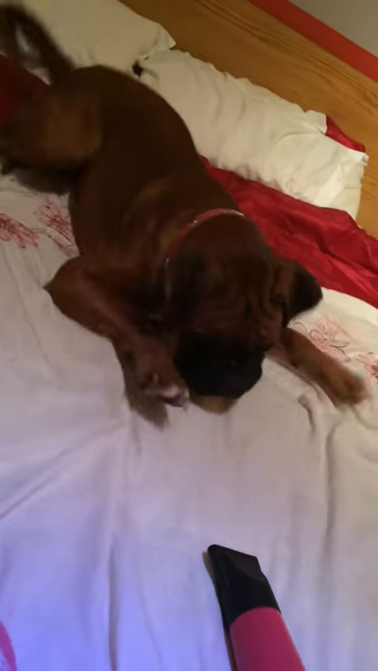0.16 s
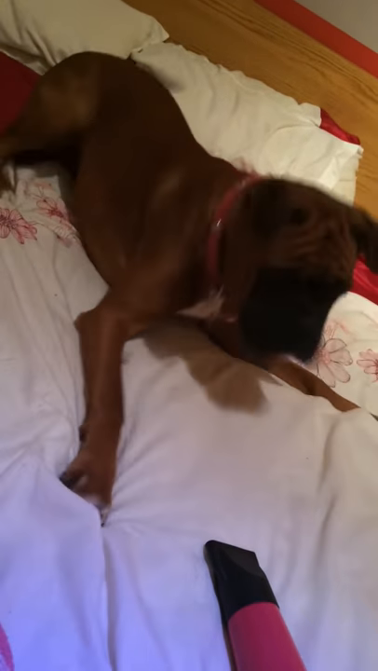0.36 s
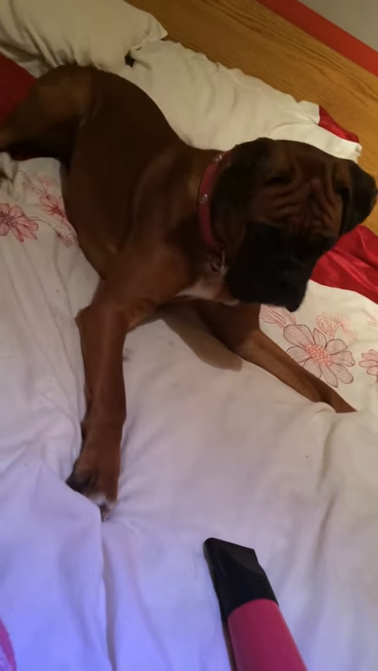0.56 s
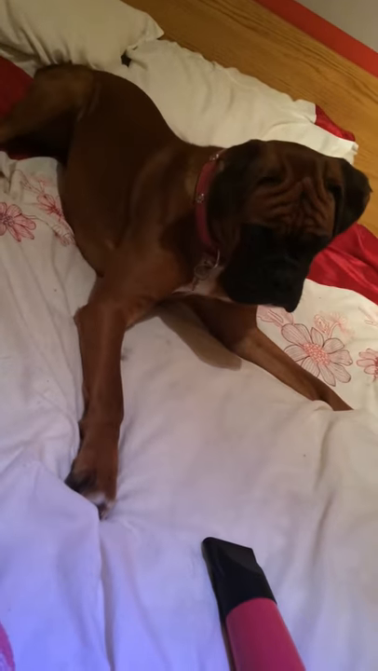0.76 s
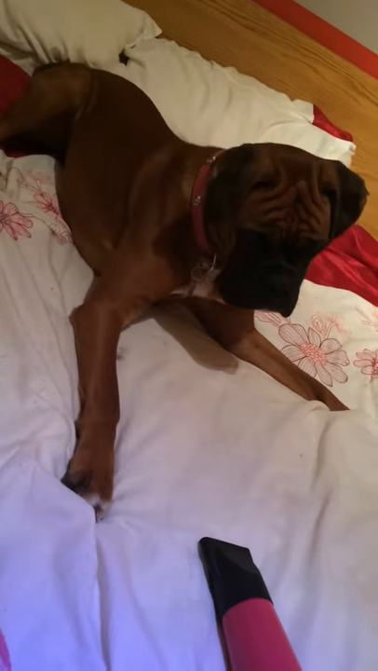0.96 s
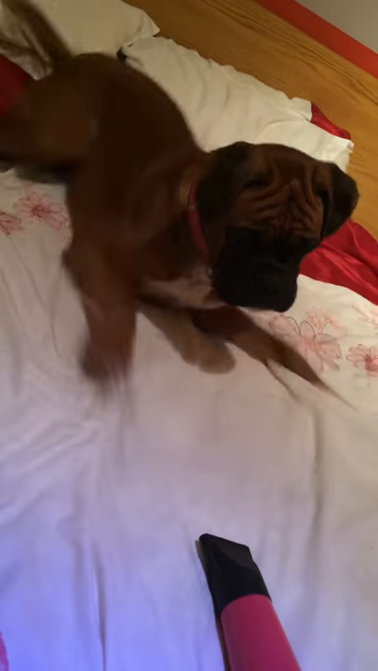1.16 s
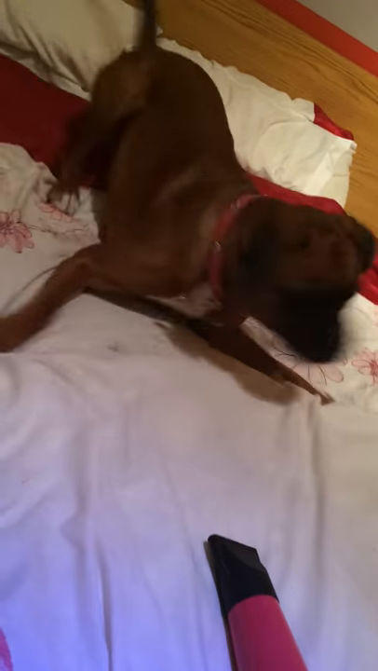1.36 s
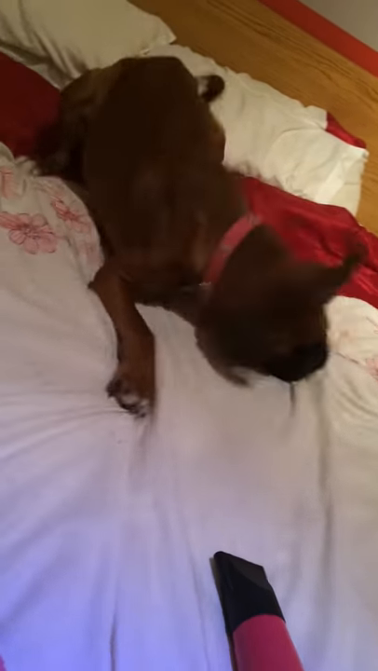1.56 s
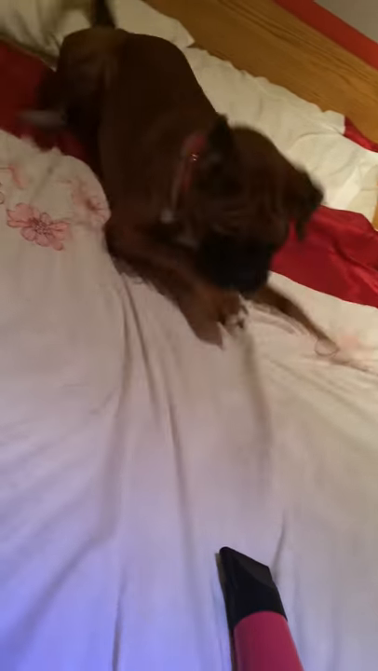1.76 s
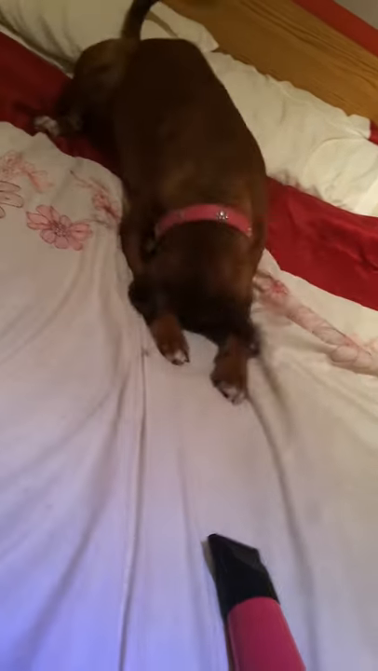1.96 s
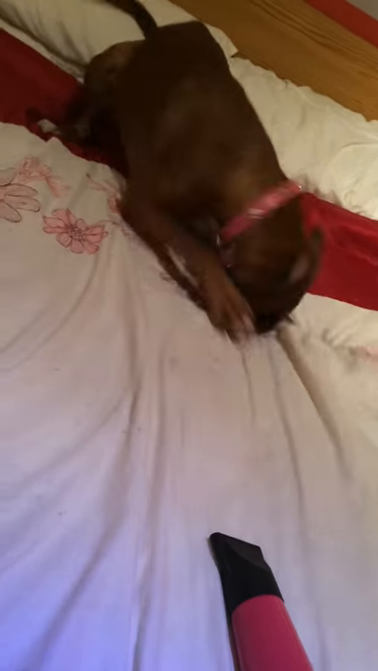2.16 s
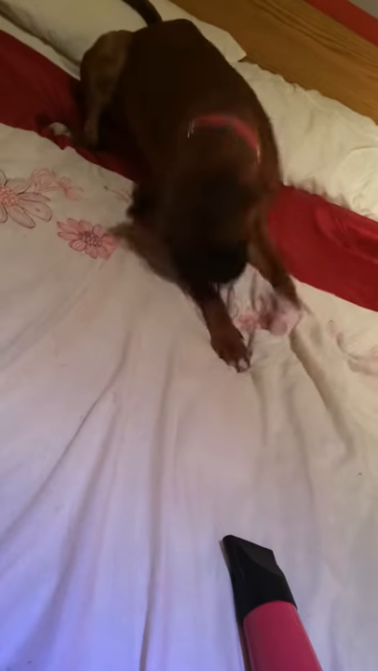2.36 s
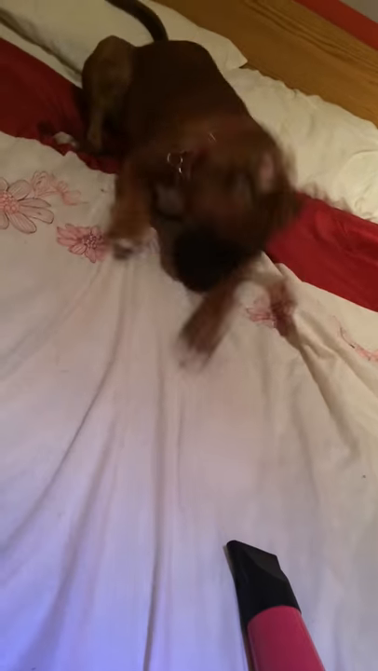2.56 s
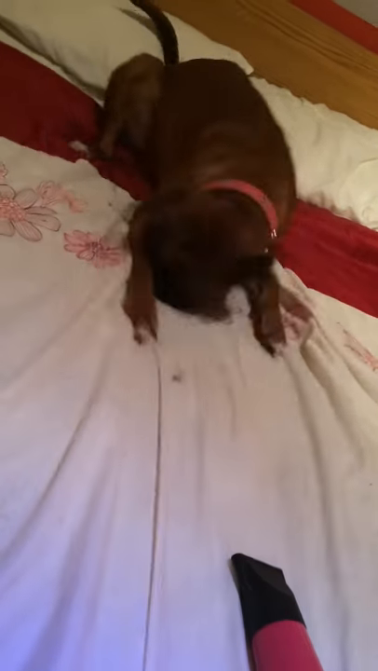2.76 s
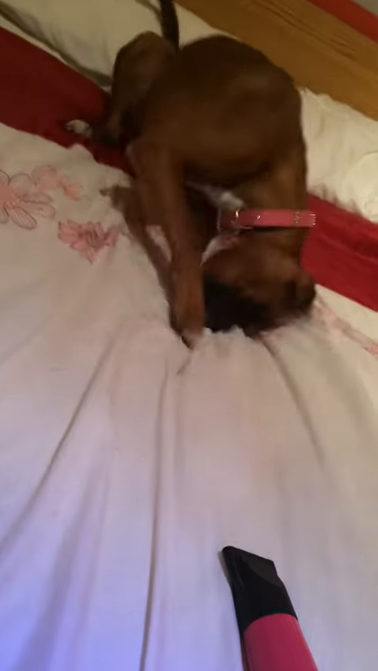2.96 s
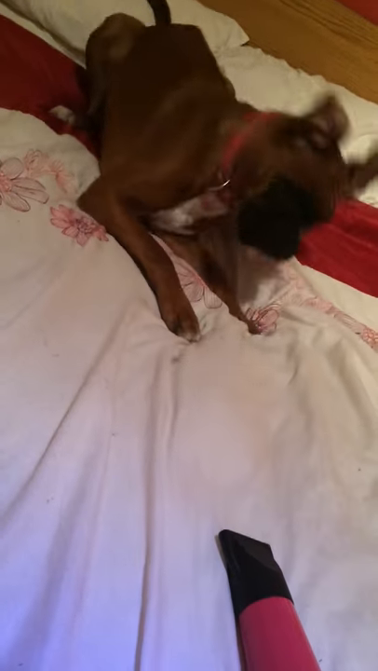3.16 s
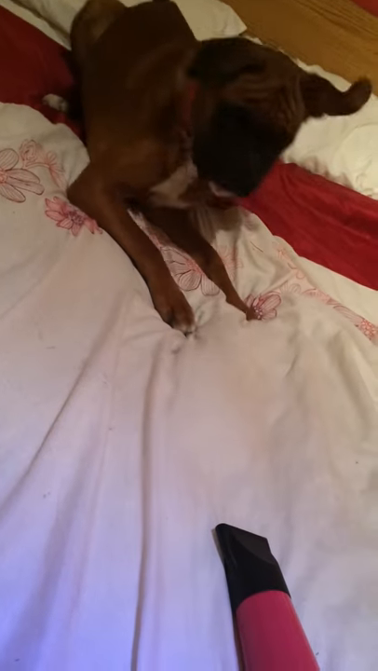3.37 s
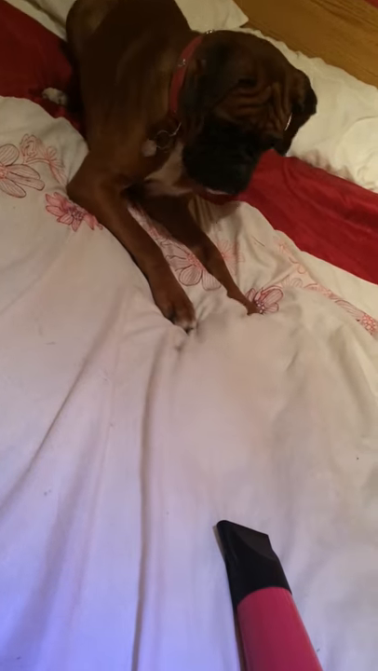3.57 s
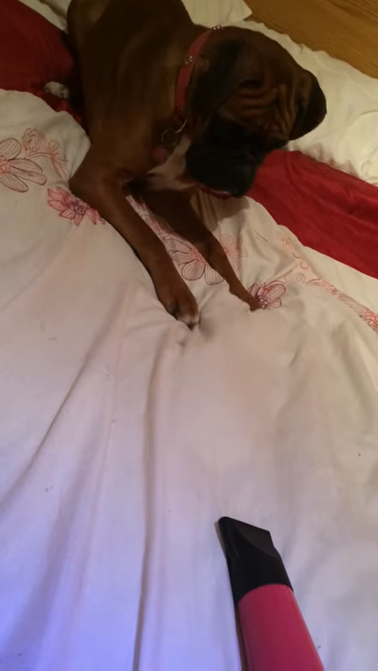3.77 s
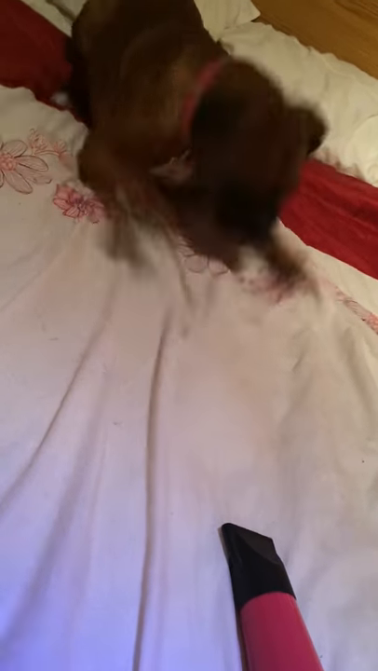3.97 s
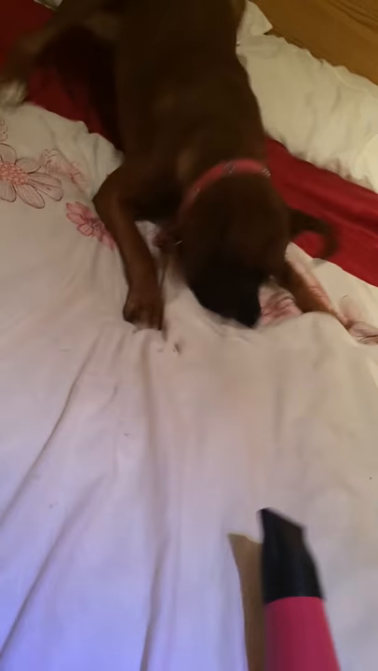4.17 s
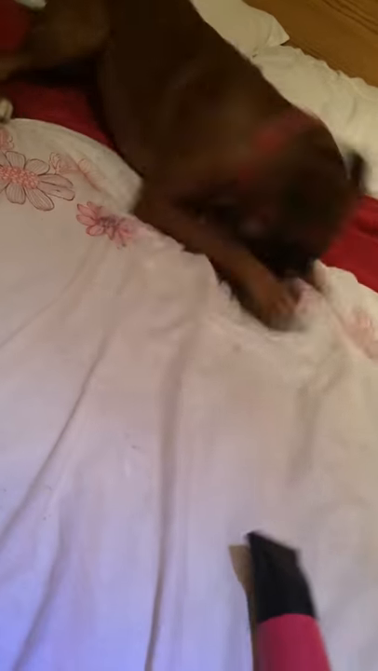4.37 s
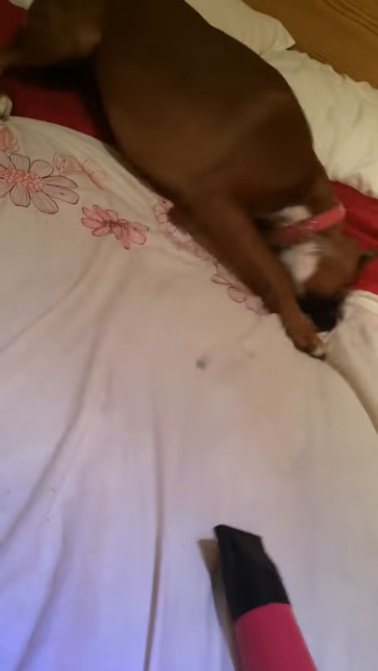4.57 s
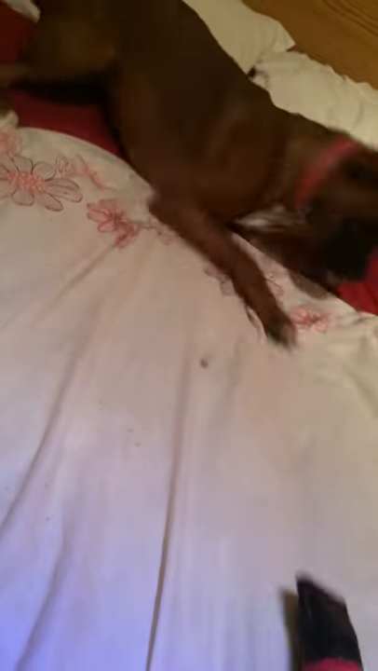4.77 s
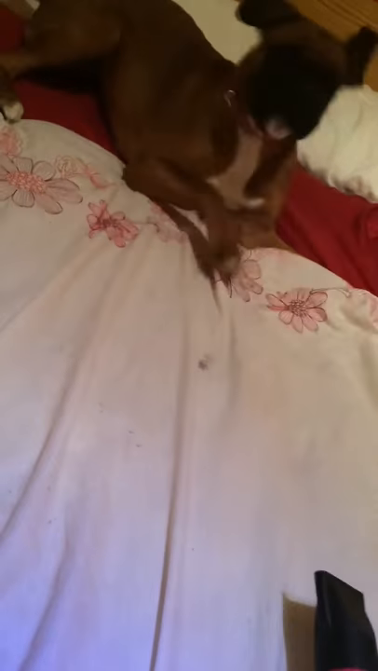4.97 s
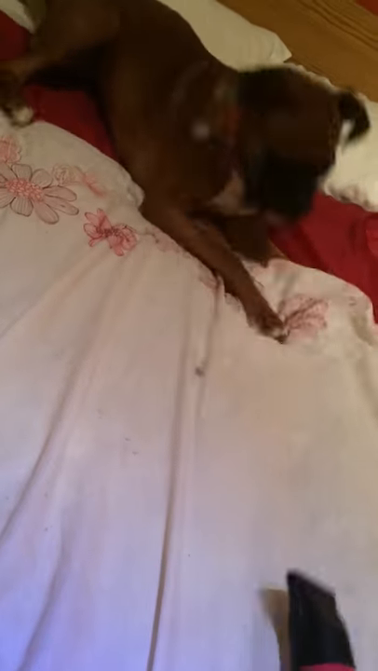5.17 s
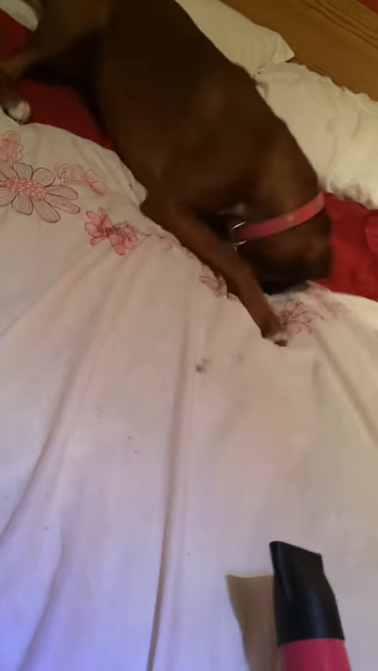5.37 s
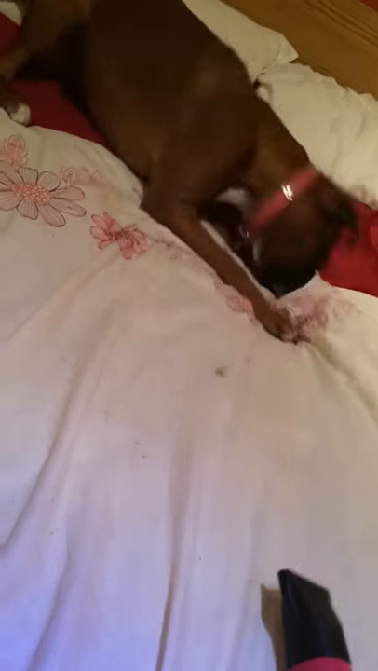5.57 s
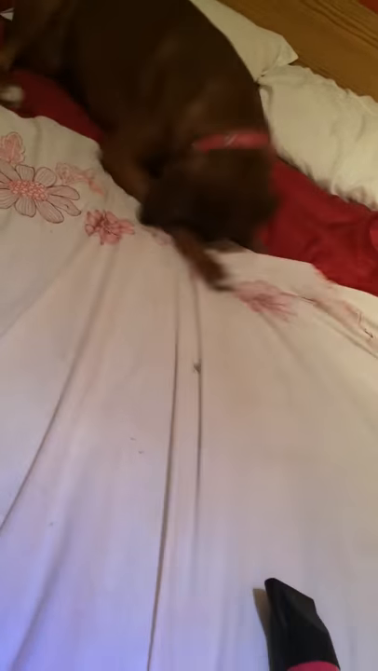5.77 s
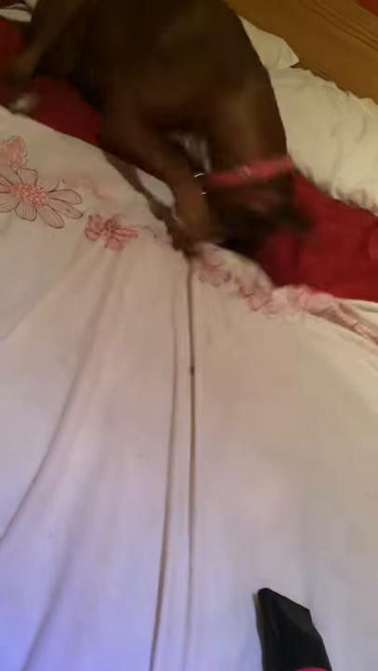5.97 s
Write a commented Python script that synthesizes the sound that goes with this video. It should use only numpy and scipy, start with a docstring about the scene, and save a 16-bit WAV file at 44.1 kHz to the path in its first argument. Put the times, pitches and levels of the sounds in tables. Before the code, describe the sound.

A big dog barks once, short and rough, in a quiet small room. Then a switch snaps close to the microphone and a hair dryer starts, its motor rising fast into an even, hissing rush with a thin whine. The blowing softens slightly as the nozzle turns aside and carries on to the end, while the dog pounces on a bed with faint, dull thumps.

```python
"""In a small bedroom, a big dog shifts on a bed and the cotton sheet rustles.
It gives one gruff bark: its vocal folds start clean, then turn rough as the jaw drops.
About a second in, a nearby hair dryer is clicked on. Its motor buzzes and spins up,
then swirling air blows steadily to the end, with a thin whine from the fan blades.
Meanwhile the dog pounces on the mattress with soft, low thuds."""
import sys
import numpy as np
from scipy import signal
from scipy.fft import rfft, irfft, next_fast_len
from scipy.io import wavfile

SR = 44100
rng = np.random.default_rng(int(sys.argv[2]) if len(sys.argv) > 2 else 0)


def inscribe(sig):
    """Save sig as 16-bit PCM at rate SR to the path in sys.argv[1].

    A 1-D sig is mono; a 2-D sig holds one channel per row.
    Samples are clipped to [-1, 1] before scaling.
    """
    pcm = np.round(np.clip(np.atleast_2d(sig).T, -1, 1) * 32767)
    wavfile.write(sys.argv[1], SR, pcm.astype(np.int16))


N = 265041
T = np.arange(N) / SR
ON_S, HUM_HZ = 1.16, 101  # when the dryer gets power; the pitch of its mains hum

# The tone of a soft, low bump. Each row: frequency in Hz, level in dB.
THUD_COLOUR = [(20, -25), (45, -12), (75, 2.5), (110, -6), (170, 0.5), (260, -28), (500, -46)]
# The low roar of air inside the dryer. Each row: frequency in Hz, level in dB.
ROAR_COLOUR = [(25, -46), (80, -26), (140, -17.5), (200, -9), (290, -8), (370, -1), (460, 2.5), (540, -0.5),
               (610, -1.5), (670, -8.5), (715, -3.5), (850, -23.5), (1500, -44)]
# The brighter rush of air through its barrel. Each row: frequency in Hz, level in dB.
RUSH_COLOUR = [(500, -26.5), (860, -8), (1000, -1), (1400, -1.5), (2100, -4), (2500, -6.5), (2900, -3.5),
               (3500, -7.5), (4400, -8), (5500, -13), (9000, -22.5)]
# How the dryer is held. Each row: time in seconds, nozzle turned aside from 0 to 1, whine level in dB.
DRYER_AIM = [(1.5, 0, -35), (1.98, 0.25, -36), (2.18, 0.25, -29.5), (2.45, 0.77, -34), (2.8, 0.73, -33.5),
             (3.15, 0.67, -33), (3.75, 0.65, -37.5), (4.15, 0.6, -37.5), (4.35, .85, -37.5),
             (4.6, 0.63, -37.5), (5.1, 0.77, -39), (5.4, 0.87, -37), (5.7, 0.7, -41), (6.01, 0.78, -39)]


def amp(db):
    """Turns decibels into a number to multiply by."""
    return 10 ** (np.asarray(db) / 20)


def unit(x):
    """Scales a sound to an average (rms) level of 1."""
    return x / np.sqrt(np.mean(x ** 2) + 1e-20)


def steady(x):
    """Evens out a sound so that its level stays near 1."""
    power = signal.oaconvolve(x ** 2, np.hanning(801) / 400, "same")
    return x / np.sqrt(abs(power) + 1e-9)


def read(points, hz):
    """Looks up a frequency in a table, sliding between rows on a musical (log) scale."""
    f, value = np.transpose(points)
    return np.interp(np.log(hz + 1), np.log(f + 1), value)


def curves(rows):
    """Turns a table that starts each row with a time into one curve for each other column."""
    s, *columns = np.transpose(rows)
    return [np.interp(T, s, column) for column in columns]


def swell(s, length):
    """A smooth rise to 1 and back, starting at s seconds."""
    return np.sin(np.pi * np.clip((T - s) / length, 0, 1)) ** 2


def fade(t, fade_s):
    """Dies away by 60 dB in fade_s seconds: the fade time."""
    return np.exp(-np.log(1000) * t / fade_s)


def noise(colour, lifts=()):
    """Noise of level 1 with a given colour (its mix of lows and highs), lifted at any resonances."""
    size = next_fast_len(N)
    hz = np.fft.rfftfreq(size, 1 / SR)
    db = read(colour, hz) + sum(lift / (1 + (2 * (hz - f) / width) ** 2) for f, width, lift in lifts)
    return unit(irfft(rfft(rng.standard_normal(size)) * amp(db))[:N])


def drift(hz):
    """A smooth random wobble of level 1, with up to about hz changes a second."""
    return unit(signal.sosfilt(signal.butter(2, hz, fs=SR, output="sos"), rng.standard_normal(N)))


def resonate(x, hz, width):
    """A resonance: lets through only the sound near hz, which may move."""
    turn = np.exp(2j * np.pi * np.cumsum(hz * np.ones(N)) / SR)
    r = np.exp(-np.pi * width / SR)
    return 2 * (turn * signal.lfilter([(1 - r) ** 2], [1, -2 * r, r * r], x / turn + 1e-18)).real


def still_room(level_db=-70.5):
    """The faint, low hush of the bedroom."""
    # The hush. Each row: frequency in Hz, level in dB.
    hush_colour = [(15, -39.5), (25, -9.5), (98, -1.5), (191, -1.5), (243, -14), (515, -9), (673, -20),
                   (1240, -18.5), (1860, -20.5), (15000, -31.5)]
    return amp(level_db) * noise(hush_colour)


def room(x, wet_db, gap_s=.006):
    """Adds the many quick echoes that bounce off the walls."""
    # How long the echoes last. Each row: frequency in Hz, fade time in seconds.
    fade_times = [(100, 0.18), (500, 0.22), (1300, 0.27), (3000, .31), (8000, 0.29), (15000, 0.25)]
    echoes = rng.standard_normal(SR // 2) * (np.arange(SR // 2) > gap_s * SR)
    hz, t, bands = signal.stft(echoes, SR, nperseg=256)
    tail = signal.istft(bands * fade(t, read(fade_times, hz)[:, None]), SR)[1]
    return x + amp(wet_db) * signal.oaconvolve(x, tail / np.linalg.norm(tail))[:N]


def afterglow(x, fade_s=0.75):
    """A blurred, mid-pitched tail that lingers in the room after the main echo."""
    # The tail. Each row: frequency in Hz, level in dB.
    glow_colour = [(300, -33.5), (440, -14), (520, -4.5), (620, -14.5), (850, -19.5), (1150, -3),
                   (1750, -6.5), (2100, -12), (4000, -21.5)]
    tail = noise(glow_colour)[:SR] * fade(T[:SR], fade_s)
    return signal.oaconvolve(x, tail / np.linalg.norm(tail))[:N]


def bedding(crinkle_db=2):
    """Cotton slides in small catches and swishes under the paws."""
    # Sliding cotton. Each row: frequency in Hz, level in dB.
    sheet_colour = [(100, 15.5), (500, 5.5), (1200, -4), (2500, -4), (4000, -8), (8000, -4.5), (15000, -10)]
    # The bedding moves under the dog. Each row: start and length in seconds, peak in dB.
    rustles = [(.02, .32, -69), (0.14, 0.075, -61), (.208, .038, -56), (0.254, .008, -46),
               (0.711, .14, -73), (0.729, 0.63, -87)]
    # Paws brush the sheet. Each row: start and length in seconds, peak in dB, centre and width in Hz.
    swishes = [(.0, .3, -72.5, 6800, 3480), (.02, 0.29, -72, 3700, 1200), (4.383, 0.058, -35, 6800, 1500)]
    slide = noise(sheet_colour) * sum(amp(db) * swell(s, length) for s, length, db in rustles)
    swish = sum(amp(db) * swell(s, length) * unit(resonate(rng.standard_normal(N), hz, width))
                for s, length, db, hz, width in swishes)
    return (slide + swish) * amp(crinkle_db * drift(90))


def paws():
    """Each landing is a soft, low push into the mattress."""
    # Paws landing. Each row: start in seconds, peak in dB, length in seconds.
    landings = [(0.321, -40.5, .05), (1.378, -37.5, 0.11), (1.669, -37, 0.052), (1.722, -43, 0.061),
                (2.033, -33, 0.086), (2.696, -42, .11), (2.864, -37.5, 0.073), (4.154, -39.5, 0.16),
                (4.559, -36, 0.043), (5.234, -44, .1)]
    return sum(amp(db) * swell(s, length) for s, db, length in landings) * steady(noise(THUD_COLOUR))


def wheezes(width_hz=200, overtone=1.52, overtone_db=-6):
    """Thin whistles that slide in pitch as the dog's lips part."""
    # The whistles. Each row: start and length in seconds, peak in dB, first and last pitch in Hz.
    whistles = [(0.3, 0.036, -37, 3610, 3540), (0.341, .072, -29.5, 5430, 2750),
                (.35, .08, -32.5, 2600, 3090)]
    out = np.zeros(N)
    for s, length, db, first_hz, last_hz in whistles:
        hz = np.interp(T, [s, s + length], [first_hz, last_hz])
        whistle = steady(resonate(rng.standard_normal(N), hz, width_hz))
        whistle += amp(overtone_db) * unit(resonate(rng.standard_normal(N), hz * overtone, 2 * width_hz))
        out += amp(db) * swell(s, length) * whistle
    return out


def rasp(puffs, effort, mouth, base_db=-24.5, shut_db=-8, ragged_db=2):
    """Ragged puffs of air hiss past the teeth, louder with effort and softer while the lips are shut."""
    # Hiss at the teeth. Each row: frequency in Hz, level in dB.
    teeth_colour = [(1500, -30), (2500, -1), (3300, -9.5), (4500, 3.5), (5500, -6.5), (6300, -5),
                    (7600, -5), (8800, -0.5), (10000, -12), (11500, -12), (15000, -20.5)]
    level = amp(base_db + shut_db * (1.5 - mouth) + ragged_db * drift(110)) * effort ** 0.62
    return level * unit(puffs * noise(teeth_colour))


def vocal_folds(pitch_hz, rough, jitter=0.13, breath_db=9):
    """The folds buzz, turning uneven and breathy when rough. Gives their sound and their puffs of air."""
    phase = 2 * np.pi * np.cumsum(pitch_hz * (1 + jitter * rough * drift(190))) / SR
    buzz = unit(sum(np.cos(k * phase) / k ** 0.67 for k in range(1, 9)))
    buzz *= 1 + rough * (np.cos(phase / 4) + drift(200))  # some pulses are strong, some weak
    puffs = 1 + 1.1 * np.cos(phase)  # air escapes each time the folds part
    breath = amp(breath_db) * rough * puffs * rng.standard_normal(N)
    return (1 - rough) * buzz + breath, puffs


def throat(buzz, mouth, shut_ratio=0.54, lowest_hz=300, cheek_hz=215, cheek_db=-8):
    """The throat shapes the buzz into a voice; its resonances rise as the jaw drops."""
    # Throat resonances. Each row: open-mouth frequency and width in Hz, level in dB open, then shut.
    resonances = [(546, 290, 3, -8.5), (776, 190, -26.5, -24), (1302, 300, 8.5, -24.5),
                  (1620, 190, 7.5, -40.5), (2390, 160, -10.5, -74)]
    stretch = shut_ratio + (1 - shut_ratio) * mouth
    voice = sum(amp(shut_db + (open_db - shut_db) * mouth) * resonate(buzz, hz * stretch, width)
                for hz, width, open_db, shut_db in resonances)
    bass_cut = signal.butter(4, lowest_hz, "high", fs=SR, output="sos")  # an open mouth gives little bass
    cheeks = amp(cheek_db) * (1 - mouth) * resonate(buzz, cheek_hz, 170)  # a shut one hums
    return steady(signal.sosfilt(bass_cut, voice) + cheeks)


def bark(jaw_s=0.293, opening_s=0.024, chest_db=-23.5, fade_db_per_s=469, sag_octaves_per_s=9):
    """The voice starts behind shut lips, opens, breaks into a chesty growl, then sinks and dies away."""
    # The bark up to its fade. Each row: time in seconds, effort in dB, pitch in Hz.
    bark_shape = [(.279, -52.5, 215), (.283, -30, 213), (.298, -27, 222.7), (.315, -24, 303),
                  (.321, -17, 467.8), (.345, -14, 457), (.376, -10, 495), (.419, -12.5, 553)]
    # The woof of the chest. Each row: frequency in Hz, level in dB.
    chest_colour = [(30, -34), (90, -26), (130, -15.5), (175, -1.5), (260, -0.5), (400, -20.5), (800, -42)]
    effort_db, pitch_hz = curves(bark_shape)
    fading_s = np.clip(T - bark_shape[-1][0], 0, 1)
    effort = amp(effort_db - fade_db_per_s * fading_s) * (T > bark_shape[0][0])
    mouth = 1 - np.exp(-np.maximum(T - jaw_s, 0) / opening_s)  # 0 is shut, 1 is open
    growl = np.sqrt(swell(s=.32, length=.05))
    rough = np.clip(0.15 + 0.35 * mouth ** 2 + 0.5 * growl + 7.2 * fading_s, 0, 1)
    buzz, puffs = vocal_folds(pitch_hz * 2 ** (-sag_octaves_per_s * fading_s), rough)
    chest = amp(chest_db) * growl * steady(noise(chest_colour))
    return effort * throat(buzz, mouth) + rasp(puffs, effort, mouth) + wheezes() + chest


def switch(snap_db=-5):
    """The dryer's slider snaps over its notches and knocks the plastic shell."""
    # The clicks. Each row: start in seconds, level in dB, snap fade time in seconds, knock in dB.
    clicks = [(1.1136, -42, 0.0074, -5), (1.1155, -40.5, 0.0065, -1), (1.1593, -17, 0.012, -28),
              (1.1703, -17, 0.009, -23)]
    # The sharp snap. Each row: frequency in Hz, level in dB.
    snap_colour = [(300, -25), (1200, -5), (2200, 3), (3000, -25), (4100, 7), (5200, -11), (7000, 2),
                   (10000, -14), (15000, -11)]
    # The notes of the shell. Each row: pitch in Hz, level in dB, fade time in seconds.
    shell_notes = [(388, 0, 0.029), (620, -12, .03), (1140, -5, .025), (1540, -4, .02), (2120, -1, .018)]
    out, t = np.zeros(N), np.arange(SR // 8) / SR
    knock = sum(amp(db) * fade(t, fade_s) * np.sin(2 * np.pi * hz * t) for hz, db, fade_s in shell_notes)
    for s, db, fade_s, knock_db in clicks:
        snap = amp(snap_db) * noise(snap_colour)[:len(t)] * fade(t, fade_s)
        start = round(s * SR)
        out[start:start + len(t)] += amp(db) * (snap + amp(knock_db) * knock / 2)
    return out


def fan_speed(lag_s=.045, leap_s=.07, creep_s=.21, creep_share=.16):
    """The fan leaps from rest (0) towards full speed (1), then creeps the rest of the way."""
    running_s = np.maximum(T - ON_S - lag_s, 0)
    leap = 1 - np.exp(-running_s / leap_s)
    creep = 1 - np.exp(-running_s / creep_s)
    return (1 - creep_share) * leap + creep_share * creep


def start_up(buzz_db=-46.5, rattle_db=-5, jolt_db=-43):
    """The switch jolts the handle, and the straining motor rattles its case until it turns freely."""
    strain = (T > ON_S) * (1 - fan_speed()) ** 2 * (1 + .5 * np.cos(2 * np.pi * HUM_HZ * T))
    buzz = amp(buzz_db) * strain * (noise(ROAR_COLOUR) + amp(rattle_db) * noise(RUSH_COLOUR))
    jolt = amp(jolt_db) * swell(ON_S, length=.022) * steady(noise(THUD_COLOUR))
    return buzz + jolt


def motor(blade_hz=2795, sag_hz_per_s=5, wobble=0.0012, octave_db=-24, fuzz_db=-8, hum_db=-56.5):
    """The fan's blades whine over the mains hum, rising in pitch as the fan speeds up."""
    speed, whine_db = fan_speed(), curves(DRYER_AIM)[1]
    hz = (blade_hz - sag_hz_per_s * (T - ON_S)) * speed
    phase = 2 * np.pi * np.cumsum(hz * (1 + wobble * drift(37))) / SR
    tone = np.sqrt(2) * (np.sin(phase) + amp(octave_db) * np.sin(2 * phase))
    fuzz = amp(fuzz_db) * unit(resonate(rng.standard_normal(N), hz, width=130))  # blades chop uneven air
    housing = 1 / (1 + ((hz - blade_hz) / 230) ** 2)  # the case only sings near full speed
    flicker_db = 0.5 * drift(3.3)
    whine = amp(whine_db + flicker_db) * speed ** 2 * housing * (tone + fuzz)
    hum = amp(hum_db) * speed * np.sqrt(2) * np.sin(2 * np.pi * HUM_HZ * T)
    return whine + hum


def airflow(roar_db=-27.5, rush_db=-27, hiss_db=-26.5, buffet_db=0.63, flutter_db=0.43):
    """Swirling air roars inside the dryer, rushes through the barrel and hisses at the nozzle."""
    # Barrel resonances. Each row: frequency and width in Hz, lift in dB with nozzle ahead, then aside.
    resonances = [(904, 35, 0, 2.5), (1072, 58, 3.5, 6), (1645, 125, 3, 3), (2132, 170, 7, 0.5),
                  (2700, 92, 1, 4), (2940, 120, 4, -3.5)]
    # Hiss at the nozzle. Each row: frequency in Hz, level in dB.
    hiss_colour = [(1500, -11.5), (3500, 1), (4500, 0), (5400, 0), (6200, 3), (6650, 1.3), (7300, 3.5),
                   (8200, 2), (9200, 1.9), (10500, 2.5), (13000, 2.5), (14500, 3), (15500, -4)]
    speed, aside = fan_speed(), curves(DRYER_AIM)[0]
    # A faster fan is louder and brighter; turning the nozzle aside takes off a few dB.
    roar_level = amp(roar_db - 4 * aside) * speed ** 0.78
    rush_level = amp(rush_db - 3.5 * aside) * speed ** 1.78
    hiss_level = amp(hiss_db - 5.5 * aside) * speed ** 2.8
    ahead = noise(RUSH_COLOUR, [(hz, width, db) for hz, width, db, _ in resonances])
    turned = noise(RUSH_COLOUR, [(hz, width, db) for hz, width, _, db in resonances])
    flutter = amp(flutter_db * drift(24))
    roar = amp(buffet_db * drift(36)) * roar_level * noise(ROAR_COLOUR)
    rush = flutter * rush_level * (np.sqrt(1 - aside) * ahead + np.sqrt(aside) * turned)
    return room(roar + rush, wet_db=-9.5) + flutter * hiss_level * noise(hiss_colour)


def scene(dog_db=-1, glow_db=-45):
    """The dog is out in the room and the dryer is close by; left and right sound the same."""
    dog = amp(dog_db) * room(bark(), wet_db=-6.0)
    dryer = airflow() + room(switch(), wet_db=-11.0) + start_up() + motor()
    bed = room(bedding(), wet_db=-8.0) + paws()
    mono = dog + amp(glow_db) * afterglow(dog) + dryer + bed + still_room()
    return np.array([mono, mono])


def record(dry):
    """Cuts away the very highest treble, above 15400 Hz."""
    treble_cut = signal.firwin(511, 15400, window=("kaiser", 9), fs=SR)
    return signal.oaconvolve(dry, treble_cut[None], "same")


dry = scene()
out = record(dry)
inscribe(out)
```